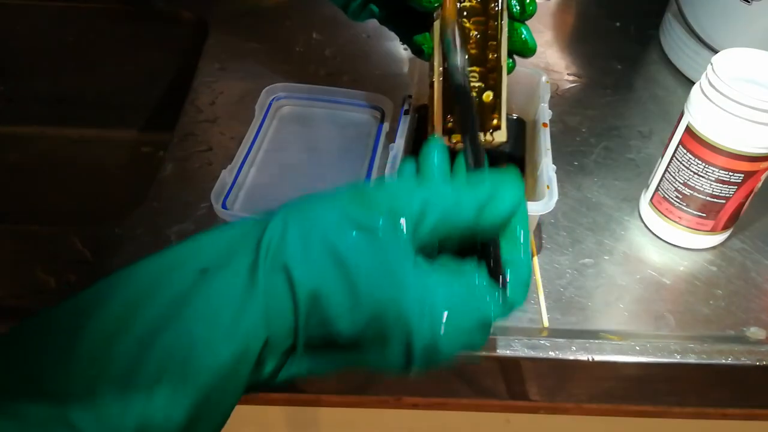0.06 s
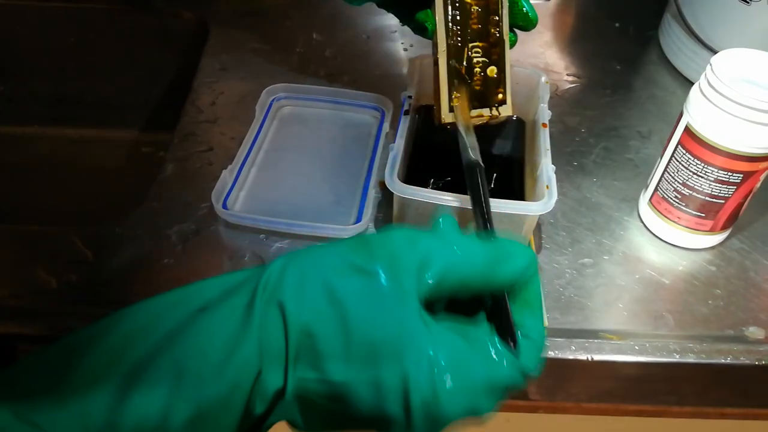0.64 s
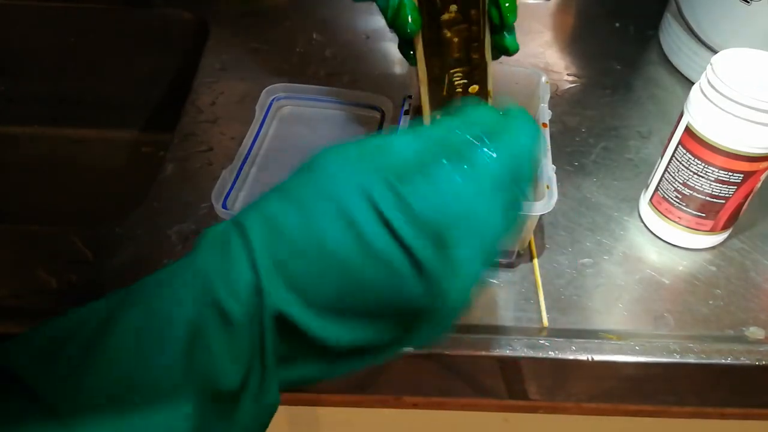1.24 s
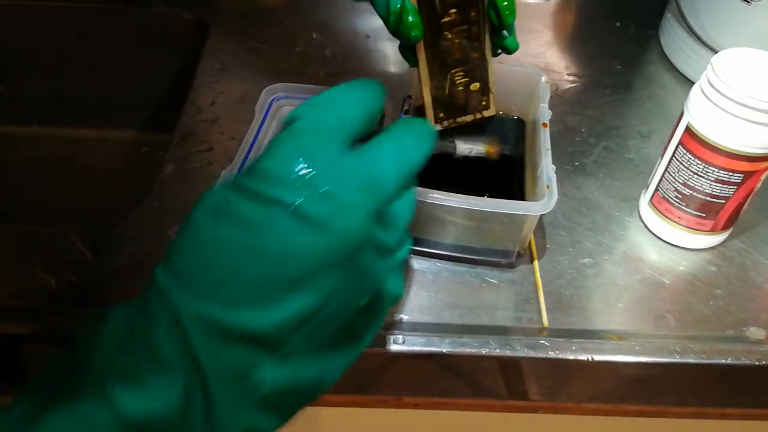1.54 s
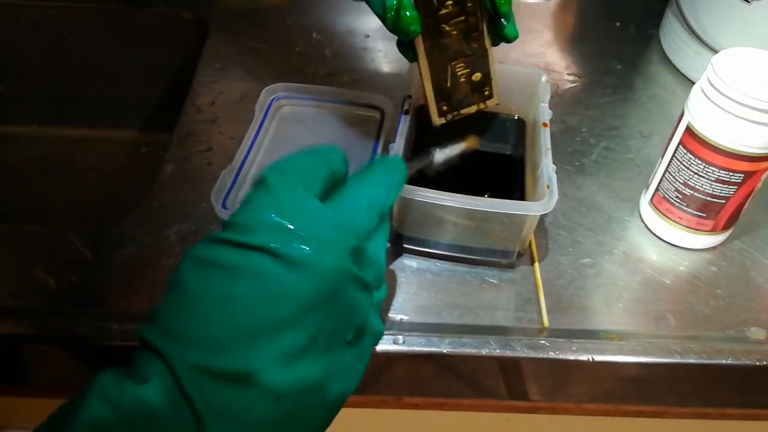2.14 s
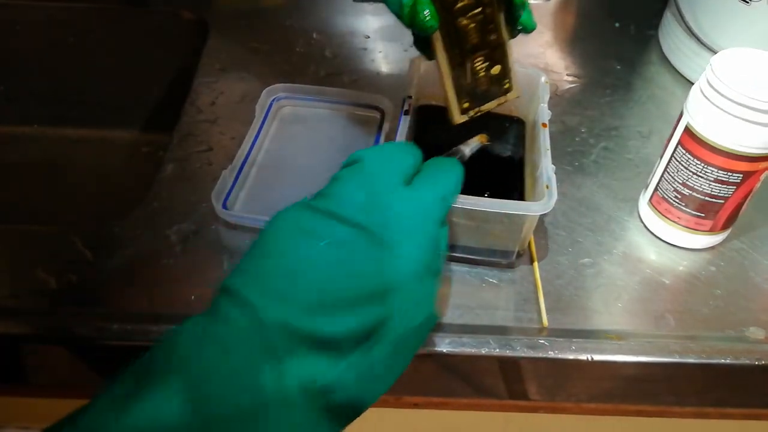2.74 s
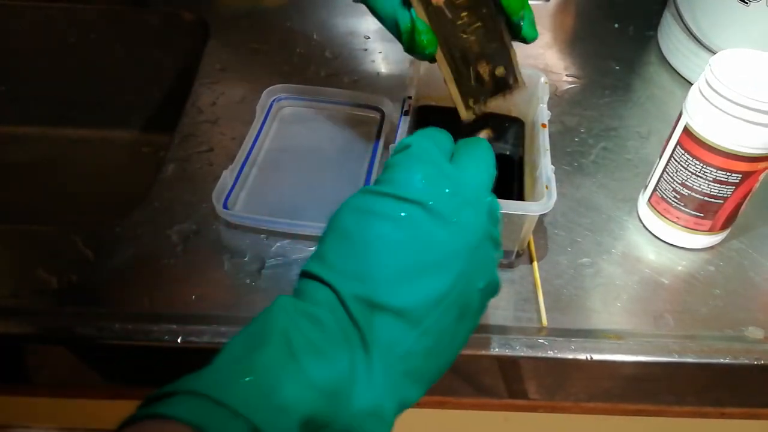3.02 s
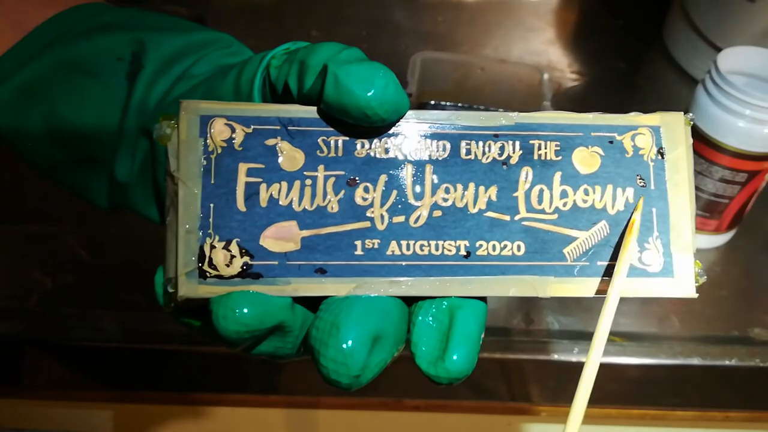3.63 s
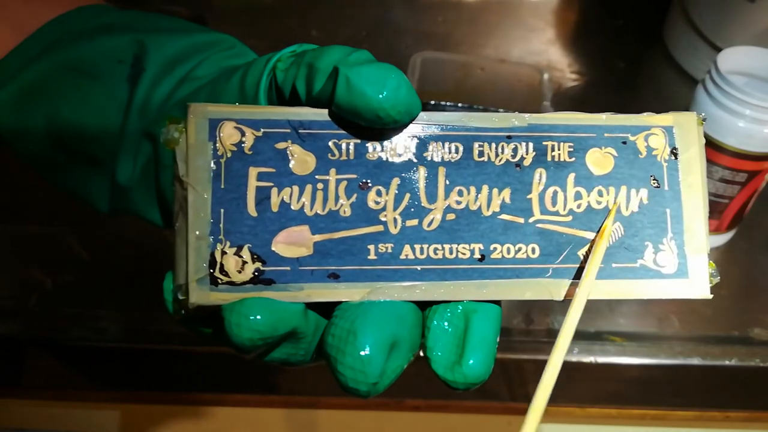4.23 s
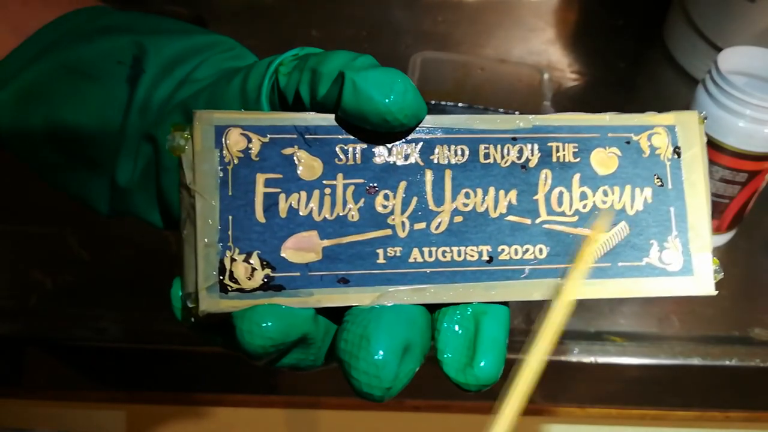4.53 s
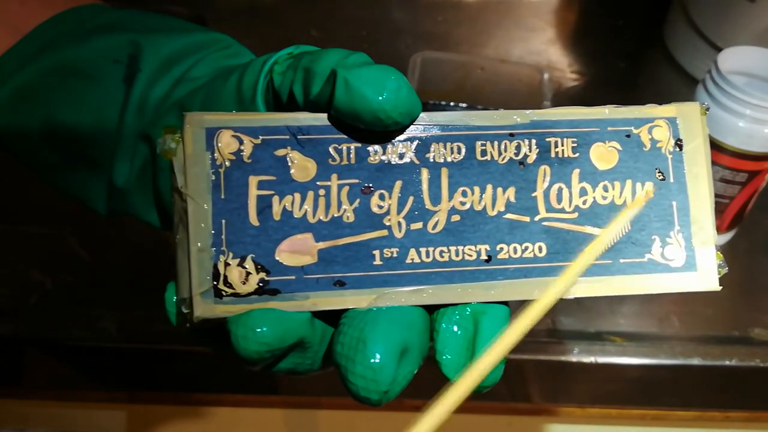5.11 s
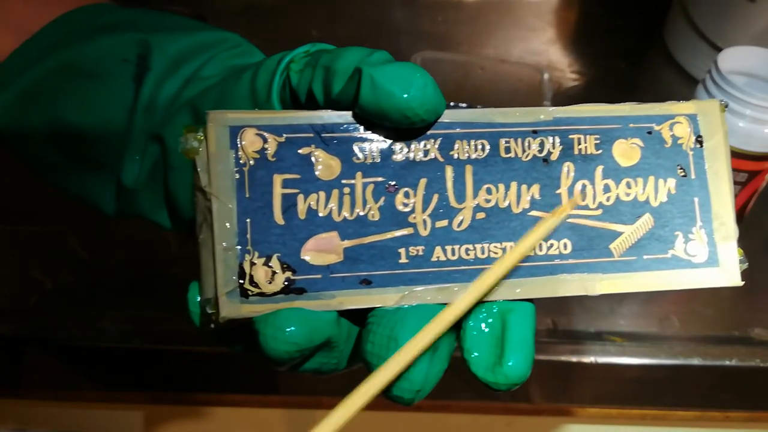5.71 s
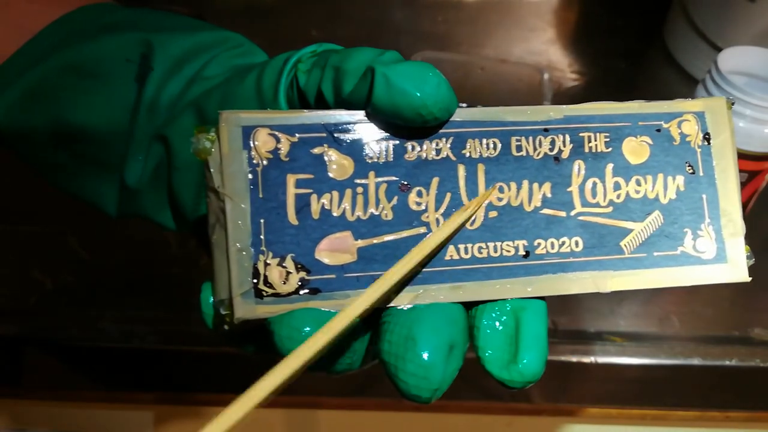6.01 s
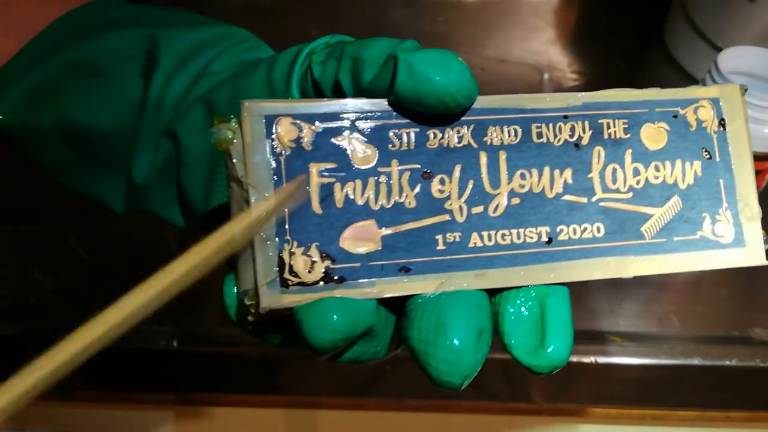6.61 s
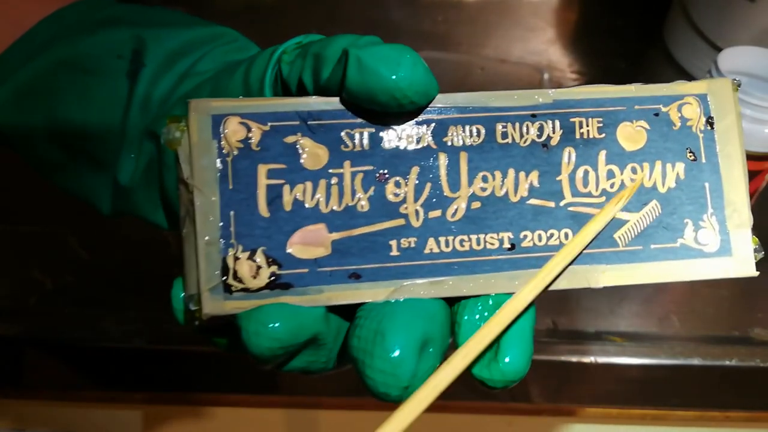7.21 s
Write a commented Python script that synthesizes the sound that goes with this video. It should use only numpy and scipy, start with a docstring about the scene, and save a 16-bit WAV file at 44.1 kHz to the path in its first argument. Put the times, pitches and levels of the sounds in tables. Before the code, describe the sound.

In a small workshop with faint steady air noise, wet bristles hiss softly. A paintbrush is then knocked five times on the rim of a plastic tub, harder toward the end, with a short boom from the steel bench beneath. Rubber gloves give tiny squelches. A wooden stick lightly taps a metal plaque and is drawn across it, ticking irregularly over the etched edges, all heard close by.

```python
"""A small workshop with steady background air. Wet bristles and rubber gloves make tiny hisses and
squelches. A paintbrush is knocked five times, harder toward the end, on the rim of a plastic tub on a
steel bench: each impact excites damped modes of tub, bench and room. Then a wooden stick taps an etched
metal plaque and is drawn over it, ticking as it slips off the edges of the letters."""
import sys
import numpy as np
from scipy import signal
from scipy.fft import irfft
from scipy.io import wavfile

SR = 44100
rng = np.random.default_rng(int(sys.argv[2]) if len(sys.argv) > 2 else 0)


def materialize(psi):
    """Save the field psi as 16-bit PCM at rate SR to the path in sys.argv[1].

    A 1-D psi becomes a single channel; in a 2-D psi each row is a channel.
    """
    bounded = np.clip(np.atleast_2d(psi).T, -1, 1)
    quanta = np.round(bounded * 32767).astype(np.int16)
    wavfile.write(sys.argv[1], SR, quanta)


N = 328721

# Spectrum of the background. Each row: frequency in Hz, relative density in dB.
AIR_SPECTRUM = [(12, -48), (20, -12), (53, -4), (74, -10.5), (123, -5), (150, -9.5), (270, -7.5), (357, -9),
                (388, -5), (590, -14), (660, -6.5), (1190, -10), (2390, -17), (3340, -16.5), (16000, -33.5)]
# Humps on that spectrum. Each row: centre in Hz, width in Hz, height in dB.
AIR_HUMPS = [(48.8, 9.7, 5), (193.5, 18, 3.5), (393.5, 4.8, 6), (480, 23, 1.5), (820, 70, -3.5),
             (960, 180, 1.5), (1494, 69, 2)]
# Likeness of the background in the two channels. Each row: frequency in Hz, correlation.
AIR_CORRELATION = [(60, 0.99), (130, 0.83), (290, 0.65), (640, -0.42), (1410, 0.5), (3100, -0.083),
                   (6820, -0.038), (15000, -0.062)]
# Balance of the background. Each row: frequency in Hz, pan in dB (always left minus right).
AIR_PAN = [(60, 0), (180, 0.5), (550, -0.5), (1650, -0.5), (4970, -1), (15000, 1.5)]
# Wet rubber. Each row: start in seconds, level in dB, centre in Hz, decay time in seconds, pan in dB.
GLOVE_SQUELCHES = [(1.223, -60, 5200, .004, -3), (3.158, -67.5, 5960, .027, 0),
                   (3.357, -61.5, 4180, .022, -4), (3.979, -44.5, 5000, 0.00046, 14),
                   (6.429, -60, 7500, .0015, 8), (6.476, -52, 6400, 0.0045, 12),
                   (6.629, -56.5, 7000, .0015, 6)]
# Blows on the rim. Each row: start in seconds, strength in dB, extra boom in dB.
BRUSH_BLOWS = [(1.864, -7, 6), (2.043, -8.5, 1), (2.1921, -6.5, 2), (2.3361, -3.5, 2.5),
               (2.4668, -1.5, 1.5)]
# Modes of tub and brush handle. Each row: frequency in Hz, level in dB, T60 in seconds, pan in dB.
TUB_MODES = [(152, -30, 0.015, 5), (224.6, -19, 0.13, 1.5), (325, -39, 0.081, -15.5),
             (505, -30.5, 0.02, 9.5), (715, -33, 0.063, -7), (890, -26.5, 0.017, 4),
             (942, -21.5, 0.041, -19), (1002, -13.5, 0.02, -7.5), (1090, -28, 0.01, 28),
             (1338, -27.5, 0.072, 1), (1596, -27, 0.027, 14), (1747, -14, 0.014, -8),
             (1870, -15, 0.011, -1), (2030, -32.5, 0.049, -10), (2540, -18, 0.013, -5),
             (2760, -23.5, 0.0046, 12), (2984, -26.5, 0.028, 3), (3280, -29, 0.028, 2),
             (3720, -35, 0.021, 9), (4470, -31, 0.011, 10), (5020, -35.5, 0.021, 6),
             (5980, -37.5, 0.024, -4), (6950, -34, 0.017, 13), (8280, -42.5, 0.0089, 13)]
# Ringing of the steel bench top and the room's low resonances after each knock.
# Each row: frequency in Hz, level in dB, T60 in seconds, pan in dB.
BENCH_AND_ROOM_MODES = [(37.5, -63, 0.79, 0), (76.2, -49.5, 0.55, -2), (111, -69, 0.65, 0),
                        (139.1, -36, 0.38, 1.5), (155, -37.5, 0.31, 0), (219.4, -31, 0.28, -1.5),
                        (273.8, -49.5, 0.35, 8), (516, -54.5, 0.22, 13), (743, -57, 0.34, -6),
                        (744, -56, 0.12, 0), (968, -42, 0.22, -9), (1170, -48, 0.24, 1),
                        (1330, -60, .25, 2), (1477, -54, 0.46, -4), (1587, -51.5, 0.43, -1),
                        (2515, -52, 0.33, -2)]
# Reverberation time of the room. Each row: frequency in Hz, T60 in seconds.
REVERB_TIMES = [(100, 0.43), (400, .35), (1500, 0.36), (5000, 0.31), (14000, 0.24)]
# The room's response to a knock. Each row: frequency in Hz, level in dB.
KNOCK_ECHO = [(60, 7), (130, 13.5), (250, 15), (350, 7.5), (600, 3), (800, 8), (1000, 17), (1450, 8.5),
              (1750, 9.5), (2200, -2.5), (2600, 2), (5000, -3), (8500, -16.5), (15000, -37)]
# Tip set down flat on the plaque. Each row: start in seconds, level in dB, pitch in Hz, pan in dB.
TIP_TAPS = [(3.7950, -42, 1820, 6.5), (4.0100, -46.5, 1100, 5), (4.0705, -41, 1520, 7.5),
            (4.2994, -38.5, 1090, 6), (5.997, -45.5, 1150, 10), (7.277, -48.5, 1100, 7)]
# The room's response to a tap or tick. Each row: frequency in Hz, level in dB.
STICK_ECHO = [(200, -18), (700, -24.5), (1150, -11), (1700, -24), (2350, -19), (3000, -22.5), (4300, -26.5),
              (8000, -29), (15000, -43)]
# Slips off an edge. Each row: start in seconds, strength in dB, extra top treble in dB.
EDGE_SLIPS = [(5.129, -9, 0), (5.631, -4, -2), (5.6798, -1, -2), (5.7251, -1, -1), (5.765, -2, 0),
              (5.8447, -3, 2), (5.864, -1.5, -4), (5.9175, -1, -1), (5.9555, -2.5, -1), (6.0696, -4.5, 4),
              (6.128, -2, 3), (6.2212, -1.5, -1), (6.2809, -2.5, -3), (6.3109, 1, -1), (6.4206, -2, 0),
              (6.4455, -5, -8), (6.4975, -2.5, 8), (6.6215, -12, 2), (7.4033, -3, 7)]
# Modes of stick and hand-held plaque. Each row: frequency in Hz, level at the plaque's end in dB,
# T60 in seconds, pan in dB, gain at its middle in dB.
PLAQUE_MODES = [(974, -40.5, 0.021, 9, 1), (965, -36.5, 0.012, 12.5, 3.5), (1173, -36.5, 0.012, 10, 3),
                (1480, -38, 0.0045, 8, -11), (2240, -45.5, 0.014, 9.5, 7), (2420, -39, 0.011, 2, -2.5),
                (3200, -39.5, 0.0096, 12.5, -5), (4310, -45, 0.014, 6, 1), (4650, -41, 0.0026, 5, 3.5),
                (5900, -49, 0.0034, 19, 9), (7120, -44.5, 0.006, 19, -2), (8550, -34.5, 0.0016, 16.5, 1.5),
                (8750, -36.5, 0.0031, 19, 1.5), (12160, -44, 0.0017, 18, -11), (12560, -44, 0.0021, 14, -1),
                (15500, -42, 0.0017, 17, -8)]
# Path of the tip. Each row: time in seconds, place from end (0) to middle (1), pan in dB.
TIP_PATH = [(5.1, .05, 3), (5.65, 0.15, -1.5), (6.1, 0.31, 2.5), (6.25, 0.91, 2.5), (6.6, .88, -1),
            (7.4, 0.39, 3.5)]


def amp(db):
    """Amplitude grows tenfold every 20 dB."""
    return 10 ** (np.asarray(db) / 20)


def unit_rms(x):
    """Normalisation to unit mean power."""
    return x / np.sqrt(np.mean(x ** 2) + 1e-20)


def curve_at(points, hz):
    """Interpolation on a logarithmic frequency axis."""
    f, value = np.transpose(points)
    return np.interp(np.log(hz + 1), np.log(f + 1), value)


def panned(x, pan_db):
    """A level difference between the channels gives direction."""
    return x * amp(np.array([[.5], [-.5]]) * pan_db)


def right_later(x, lag_s):
    """Path difference: sound from the left arrives later on the right."""
    return np.array([x[0], np.pad(x[1], (round(lag_s * SR), 0))[:x.shape[1]]])


def add(mix, start_s, sound):
    """Superposition: a stereo sound adds to the mix from start_s on."""
    part = mix[:, round(start_s * SR):][:, :sound.shape[1]]
    part += sound[:, :part.shape[1]]


def soften(x, cutoff_hz):
    """Contact as a low-pass filter: a softer one lasts longer and excites less treble."""
    pole = np.exp(-2 * np.pi * cutoff_hz / SR)
    return signal.lfilter([1 - pole], [1, -pole], x)


def hiss(hz, size, spread):
    """Band-limited stereo noise from hz / spread to hz * spread."""
    band = signal.butter(2, [hz / spread, hz * spread], "band", fs=SR, output="sos")
    return unit_rms(signal.sosfilt(band, rng.standard_normal((2, size))))


def correlate(spectra, correlation):
    """Partial coherence: the right channel takes a share of the left."""
    left, other = spectra
    return np.array([left, correlation * left + np.sqrt(1 - correlation ** 2) * other])


def ring(modes, travel_s, stretch=1):
    """Damped modes of alternating sign; dispersion brings the treble first (travel_s holds at 1 kHz)."""
    t, out = np.arange(SR // 2) / SR, 0
    for k, (hz, db, t60, pan_db) in enumerate(modes):
        age = np.maximum(t - travel_s / np.sqrt(hz / 1000), 0)
        mode = amp(db - 60 * age / t60) * np.sin(2 * np.pi * hz * stretch * age)
        out = out + panned((-1) ** k * mode, pan_db)
    return out


def air(level_db=-62):
    """Stationary noise with a humped spectrum, most coherent in the bass."""
    hz = np.fft.rfftfreq(N, 1 / SR)
    white = rng.standard_normal((2, len(hz))) + 1j * rng.standard_normal((2, len(hz)))
    humps_db = sum(db * np.exp(-((hz - centre) / width) ** 2) for centre, width, db in AIR_HUMPS)
    stereo = panned(correlate(white, curve_at(AIR_CORRELATION, hz)), curve_at(AIR_PAN, hz))
    spectrum = stereo * amp(curve_at(AIR_SPECTRUM, hz) + humps_db)
    return amp(level_db) * unit_rms(irfft(spectrum, N))


def brush_stroke(peak_s=1.25, width_s=.23, level_db=-69.5, bubble_s=1.2215, bubble_hz=4100):
    """Friction noise of bristles swells and fades on the wet plaque; one bubble bursts and resonates."""
    swell = np.exp(-((np.arange(N) / SR - peak_s) / width_s) ** 2)
    out = amp(level_db) * swell * hiss(4000, size=N, spread=1.7)
    add(out, bubble_s, ring([(bubble_hz, -51.5, .026, -3)], travel_s=0))
    return out


def glove_squelches():
    """Adhesion: wet rubber on a sticky coating gives short, decaying bursts of noise."""
    out, t = np.zeros((2, N)), np.arange(SR // 5) / SR
    for start_s, db, hz, decay_s, pan_db in GLOVE_SQUELCHES:
        burst = hiss(hz, size=len(t), spread=1.43) * np.exp(-t / decay_s)
        add(out, start_s, panned(amp(db) * burst, pan_db))
    return out


def brush_knocks(fresh_db=-6, crack_db=-52, crack_s=.002):
    """Impact excitation: each blow cracks on the rim, makes the tub clack and bench and room boom."""
    out, t = np.zeros((2, N)), np.arange(SR // 2) / SR
    # The tub's clack is kept between 45 Hz and 9.5 kHz.
    radiation = signal.butter(2, [45, 9500], "band", fs=SR, output="sos")
    tub = signal.sosfilt(radiation, ring(TUB_MODES, travel_s=0.00079))
    boom = ring(BENCH_AND_ROOM_MODES, travel_s=0.00373)
    shared_echo = reverberation(KNOCK_ECHO)
    for start_s, db, boom_db in BRUSH_BLOWS:
        # A stronger blow is brighter, one that sinks into the bench duller.
        cutoff_hz = 13800 * 2 ** (0.2365 * db - 0.27 * boom_db)
        crack = amp(crack_db) * hiss(7000, size=len(t), spread=2.3) * np.exp(-t / crack_s)
        room = (shared_echo + amp(fresh_db) * reverberation(KNOCK_ECHO)) / np.hypot(1, amp(fresh_db))
        body = soften(tub + amp(boom_db) * boom + room, cutoff_hz)
        add(out, start_s, amp(db) * (crack + body))
    return out


def reverberation(colour, first_s=0.0013, build_s=0.0011, coherent_hz=520, echoes_per_s=5000):
    """A diffuse field: dense random echoes decay exponentially, their bass alike in both channels."""
    size = SR // 2
    echoes = rng.choice([-1., 1.], (2, size)) * (rng.random((2, size)) < echoes_per_s / SR)
    hz, t, spectra = signal.stft(echoes, SR, nperseg=512)
    hz = hz[:, None]
    t60 = curve_at(REVERB_TIMES, hz)
    spectra = correlate(spectra, np.exp(-(hz / coherent_hz) ** 2))
    spectra *= amp(curve_at(colour, hz) - 60 * t / t60)
    spectra *= np.sqrt(np.log(1e6) / t60 / SR)  # energy independent of decay time
    tail = signal.istft(spectra, SR, nperseg=512)[1][:, :size] / echoes.std()
    return tail * np.clip((np.arange(size) / SR - first_s) / build_s, 0, 1)


def stick_taps(pock_t60=0.0067, plaque_t60=0.014, grit_s=0.0021, snap_s=0.00039, room_db=26):
    """Heavily damped impacts: a tiny snap, a short pock with two plaque modes, and a little grit."""
    out, t = np.zeros((2, N)), np.arange(SR // 2) / SR
    plaque = [(980, -7, plaque_t60, 0), (3200, -15, plaque_t60, 0)]
    for start_s, db, hz, pan_db in TIP_TAPS:
        pock = ring([(hz, 0, pock_t60, 0)] + plaque, travel_s=0.00099)
        grit = amp(-13) * hiss(3400, size=len(t), spread=1.95) * np.exp(-t / grit_s)
        snap = amp(-13) * hiss(15000, size=len(t), spread=1.15) * np.exp(-t / snap_s)
        room = amp(room_db) * reverberation(STICK_ECHO)
        add(out, start_s, panned(amp(db) * (snap + pock + grit + room), pan_db))
    return out


def stick_ticks(scrape_s=0.0015, scrape_db=-48.5, snap_db=-41, crisp_hz=12000):
    """Catch and release: the tip scrapes up an edge and snaps off; the contact point weights the modes."""
    out, lead = np.zeros((2, N)), round(scrape_s * SR)
    stretches = 1 + .008 * rng.standard_normal(len(EDGE_SLIPS))
    times, places, pans = np.transpose(TIP_PATH)
    for (start_s, db, crisp_db), stretch in zip(EDGE_SLIPS, stretches):
        place, pan_db = np.interp(start_s, times, places), np.interp(start_s, times, pans)
        # A stronger slip is brighter, one near the middle duller.
        cutoff_hz = 22000 * 2 ** (0.11 * db - 1.35 * place)
        modes = [(hz, end_db + place * middle_db + crisp_db * min(hz / crisp_hz, 1) ** 4, t60, side_db)
                 for hz, end_db, t60, side_db, middle_db in PLAQUE_MODES]
        tick = np.pad(ring(modes, travel_s=0.00017, stretch=stretch), ((0, 0), (lead, 0)))
        scrape = amp(scrape_db) * hiss(3440, size=2 * lead, spread=1.94) * np.hanning(2 * lead)
        snap = amp(snap_db) * np.array([.5, 1, .5])
        tick[:, :2 * lead] += panned(scrape, pan_db=10)
        tick[:, lead:lead + 3] += panned(snap, pan_db=14)
        direct = panned(right_later(tick, lag_s=.0006), pan_db)
        add(out, start_s, amp(db) * soften(direct, cutoff_hz))
        add(out, start_s, amp(db) * soften(reverberation(STICK_ECHO), cutoff_hz))
    return out


def scene():
    """Superposition of brush, gloves and stick on the air of the workshop."""
    return air() + brush_stroke() + glove_squelches() + brush_knocks() + stick_taps() + stick_ticks()


def record(dry, cutoff_hz=16100):
    """Band limiting: a steep low-pass filter removes the highest treble."""
    lowpass = signal.firwin(301, cutoff_hz, window=("kaiser", 8), fs=SR)
    return signal.oaconvolve(dry, lowpass[None], "same")


dry = scene()
out = record(dry)
materialize(out)
```